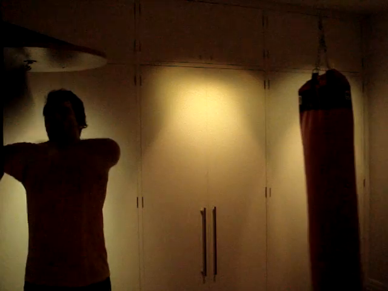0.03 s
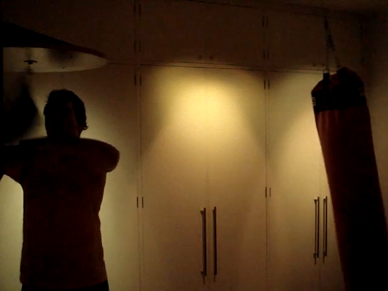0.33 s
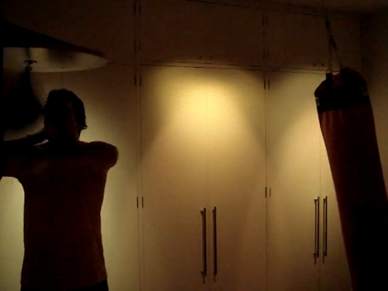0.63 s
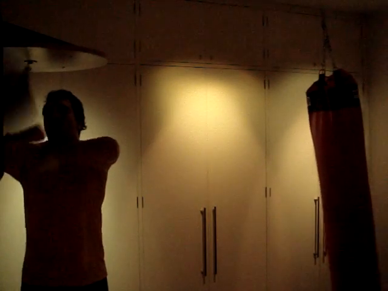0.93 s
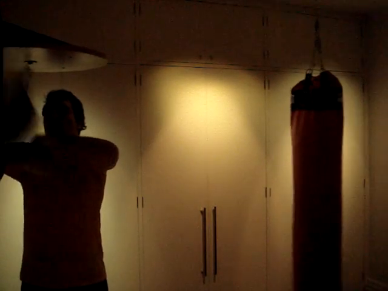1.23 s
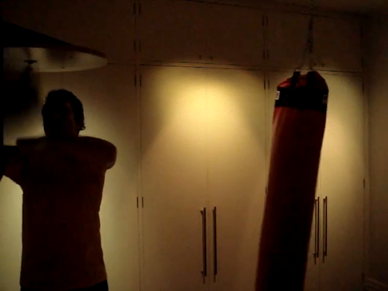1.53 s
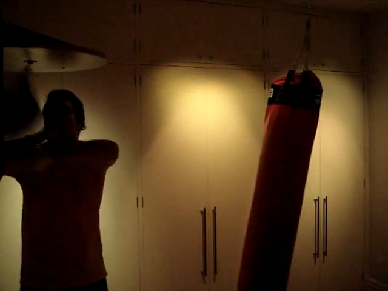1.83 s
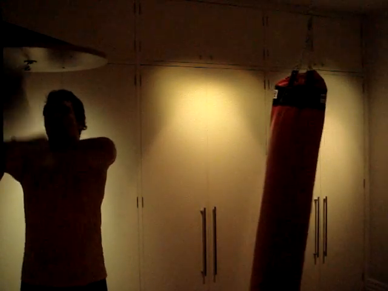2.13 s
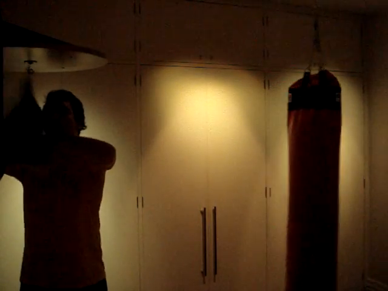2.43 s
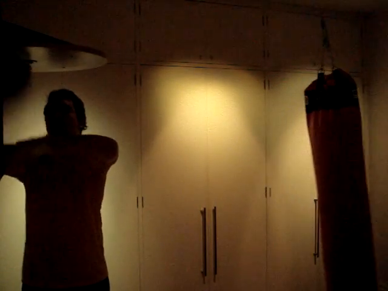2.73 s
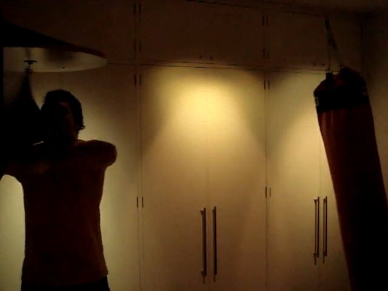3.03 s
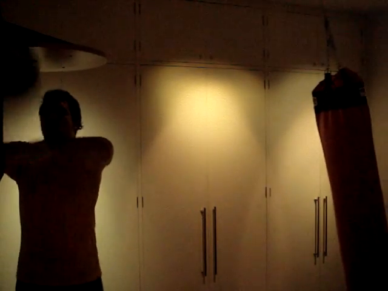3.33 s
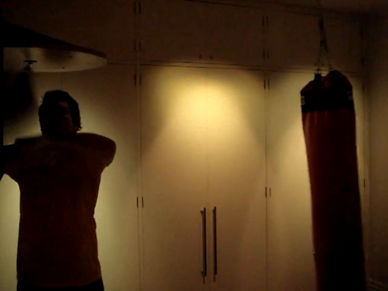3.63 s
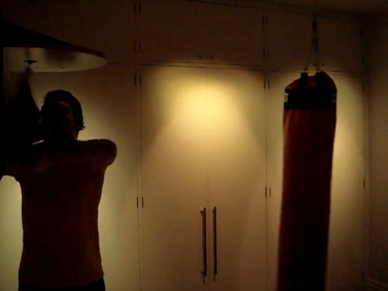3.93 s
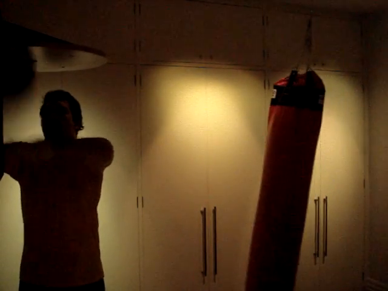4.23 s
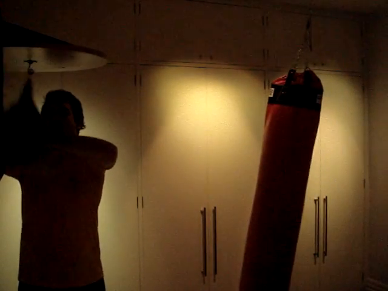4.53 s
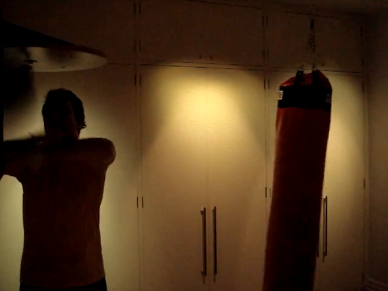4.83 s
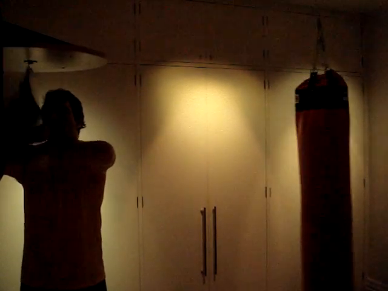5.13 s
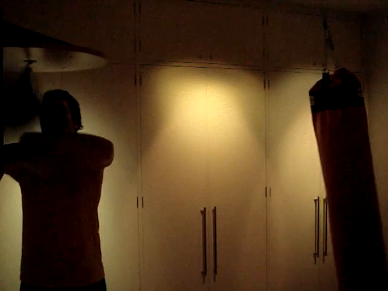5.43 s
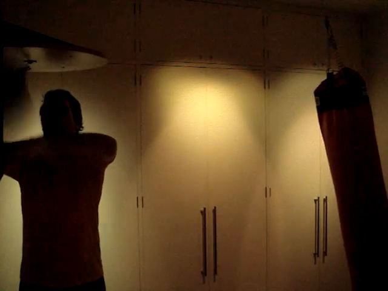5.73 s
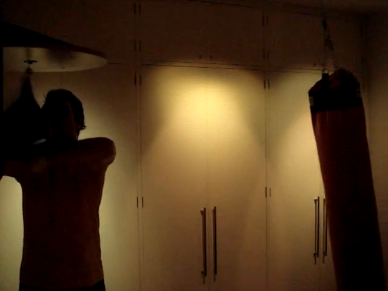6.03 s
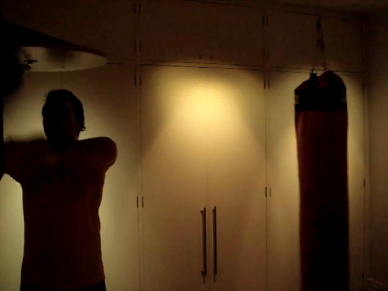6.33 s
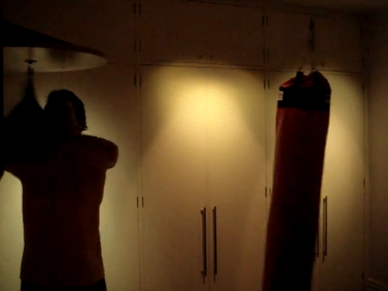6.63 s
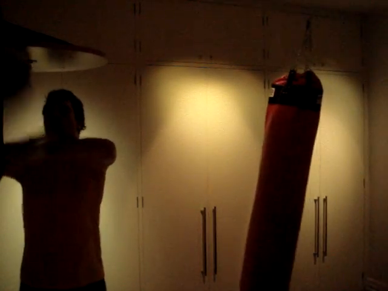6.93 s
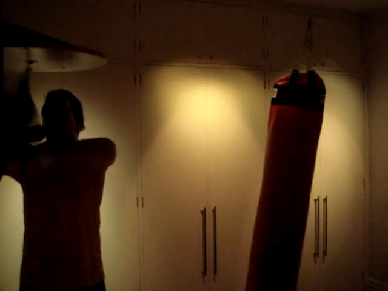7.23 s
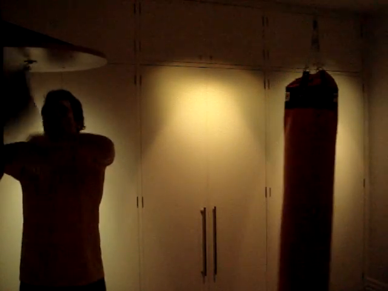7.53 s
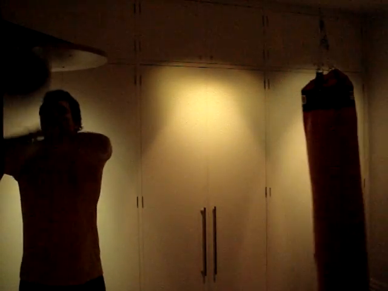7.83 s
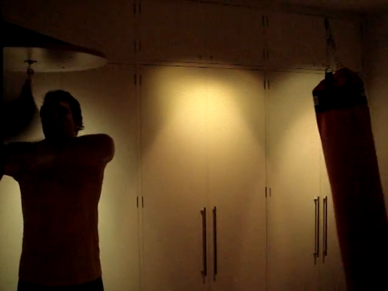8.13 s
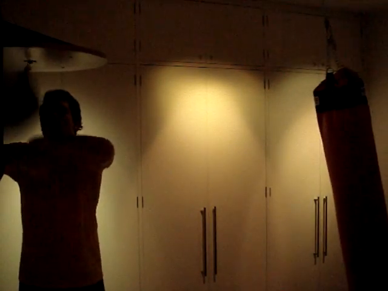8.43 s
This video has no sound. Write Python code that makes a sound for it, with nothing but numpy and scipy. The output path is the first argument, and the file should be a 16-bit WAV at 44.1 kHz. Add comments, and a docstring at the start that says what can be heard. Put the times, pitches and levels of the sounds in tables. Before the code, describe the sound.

Rapid, regular thuds and slaps of a speed bag rebounding off a wooden board, with a clacking, sometimes squeaking metal swivel.

```python
"""A leather speed bag is rolled, about 8.5 rebounds a second, in a small hard-walled room.
Each swing opens with a dull low thump, a knock and a faint brush. Some 40 ms later the bag slaps
the wooden platform, which knocks and booms. As the bag flattens against the board, the swivel
clacks on its stop. Five times, between 1.8 and 5.5 s, the swivel also squeaks.
A faint room rumble lies under it all."""
import sys
import numpy as np
from scipy import signal
from scipy.fft import rfft, irfft
from scipy.io import wavfile

SR = 44100
rng = np.random.default_rng(int(sys.argv[2]) if len(sys.argv) > 2 else 0)


def transcribe(u):
    """Save the signal u as a 16-bit wav file named by the first command-line argument.

    u: samples, shape (n,) or (channels, n), limited to [-1, 1]; the rate is SR.
    q: integer samples, one column per channel.
    """
    v = np.clip(np.atleast_2d(u).T, -1, 1)
    q = np.round(v * 32767).astype(np.int16)
    wavfile.write(sys.argv[1], SR, q)


N = 379260
SIZE = 16384   # samples per blow
AGE_S = np.arange(SIZE) / SR
HZ = np.maximum(np.fft.rfftfreq(SIZE, 1 / SR), 1)


def from_db(db):
    """Decibels to gain."""
    return 10 ** (np.asarray(db) / 20)


def rms_one(x):
    """Each row scaled to rms 1."""
    return x / np.sqrt(np.mean(x ** 2, axis=-1, keepdims=True) + 1e-20)


def butter(x, order, hz, kind="low"):
    """Butterworth filter."""
    return signal.sosfilt(signal.butter(order, hz, kind, fs=SR, output="sos"), x)


def spectrum_gain(points):
    """Gain through (Hz, dB) points on a log-frequency axis."""
    hz, db = np.transpose(points)
    return from_db(np.interp(np.log(HZ), np.log(hz), db))


def resonances(modes, skirt=1.96):
    """Gain of a body that radiates little below its lowest mode and above its highest."""
    power = sum(from_db(db) ** 2 / (1 + ((HZ / hz - hz / HZ) * hz / width_hz) ** 2)
                for hz, width_hz, db in modes)
    outside = np.maximum(modes[0][0] / HZ, HZ / modes[-1][0]) / skirt
    return np.sqrt(power / (1 + outside ** 8))


def minimum_phase(gain):
    """Causal response with this gain: nothing sounds before the contact."""
    cepstrum = irfft(np.log(gain + 1e-5))
    fold = np.r_[1, np.full(SIZE // 2 - 1, 2), 1, np.zeros(SIZE // 2 - 1)]
    return np.exp(rfft(cepstrum * fold))


def place(times_s, level_db, sounds, rms_window_s=0.08):
    """Lays sounds on the time line, each at its rms level over the opening window."""
    out = np.zeros(N + 3 * SIZE)
    for s, db, sound in zip(times_s, level_db, sounds):
        start = SIZE + round(s * SR)
        out[start:start + SIZE] += from_db(db) * sound / np.std(sound[:round(rms_window_s * SR)])
    return out[SIZE:SIZE + N]


def room_rumble(level_db=-52, band_hz=(25, 160)):
    """Faint low background of the room."""
    return from_db(level_db) * rms_one(butter(rng.standard_normal(N), 1, band_hz, "band"))


# Room decay. Each row: band centre in Hz, T60 in seconds.
ROOM_DECAY = [(200, 0.52), (800, 0.77), (3000, 0.6), (6000, 0.36), (10000, 0.27)]


def room_tails(count, gap_s, build_s, steady):
    """After a gap, reflections swell and die; all but a steady share change as the bag moves."""
    common = np.sqrt(steady) * rng.standard_normal(SIZE)
    changing = np.sqrt(1 - steady) * rng.standard_normal((count, SIZE))
    spectrum = rfft(common + changing)
    centres_hz, t60s_s = np.transpose(ROOM_DECAY)
    tail = 0
    for t60_s, selector in zip(t60s_s, np.eye(len(centres_hz))):
        band = np.interp(np.log(HZ), np.log(centres_hz), selector)
        tail = tail + irfft(spectrum * band) * from_db(-60 * AGE_S / t60_s)
    return rms_one(tail * np.clip((AGE_S - gap_s) / build_s, 0, 1))


def blows(times_s, level_db, body_gain, contact_s, direct_db, early_db, early_s, gap_s, build_s, steady,
          soft_hz=6000, yield_s=0.0025):
    """A short, rough contact rings a body; the near walls answer in a cluster, then the whole room."""
    count = len(times_s)
    yielding = 1 - np.exp(-AGE_S / yield_s)   # a soft contact builds its force gradually
    release = np.exp(-np.minimum(AGE_S / contact_s, 20))
    contact = rng.standard_normal((count, SIZE)) * yielding * release
    direct = from_db(direct_db) * rms_one(butter(contact, 2, soft_hz))
    early_age = np.clip((AGE_S - gap_s) / early_s, 0, 20)
    early = rms_one(rng.standard_normal((count, SIZE)) * early_age * np.exp(-early_age))
    heard = direct + from_db(early_db) * early + room_tails(count, gap_s, build_s, steady)
    return place(times_s, level_db, irfft(rfft(heard) * minimum_phase(body_gain)))


def clean_knocks(times_s, level_db, modes, vary_db):
    """A blunt push starts all modes together, each with its own strength on every blow."""
    hz, width_hz, db = np.transpose(modes)
    decay = np.exp(-np.minimum(np.pi * width_hz[:, None] * AGE_S, 20))
    rings = np.sin(2 * np.pi * hz[:, None] * AGE_S) * decay
    strengths = width_hz * from_db(db + vary_db * rng.standard_normal((len(times_s), len(hz))))
    polarity = (-1) ** np.arange(len(hz))
    return place(times_s, level_db, (strengths * polarity) @ rings)


# Bag meets platform. Each row: time in seconds, force in dB, snap of the first contact in dB.
REBOUNDS = [(-0.055, -0.5, -5), (0.063, -2.5, -5), (0.186, -0.5, -9), (0.298, -1.5, -5), (0.416, -3, -5),
            (0.525, 3.5, -2.0), (0.641, 0.5, 2), (0.761, 3, 0.5), (0.891, -1.5, -1), (1.003, 3, 4.0),
            (1.125, -1, -2.0), (1.236, 2.5, 2.0), (1.369, -2, 1), (1.478, 3, 5), (1.599, 1.0, -6),
            (1.724, -0.5, -4.0), (1.84, -2.5, -6), (1.965, 4, 0.0), (2.083, -2.5, -3.0), (2.208, 2.5, 5.0),
            (2.324, -2.5, 2), (2.432, 2.5, 1), (2.541, 1, 2), (2.661, -3, -5.0), (2.776, -3.5, -5),
            (2.9, 3, 1), (3.024, 0, 2.0), (3.144, -1.5, -0.5), (3.257, -2, -5.0), (3.373, 0, 0),
            (3.483, 1.5, -2.0), (3.597, -0.5, -5), (3.702, 1.5, -1), (3.816, -2.5, -4.0), (3.946, -0.0, 1),
            (4.049, -0.5, -3.0), (4.172, 1, 2.0), (4.276, 1, -4), (4.41, 0.5, 4), (4.51, -1, 0.0),
            (4.631, -1, -3), (4.744, 0, -1), (4.874, 0, 4.0), (4.979, -3.5, -4), (5.094, 2, 3.0),
            (5.218, 3.5, 1), (5.326, 2.5, 4.5), (5.445, 2.5, 0.0), (5.548, -1.5, 0.0), (5.677, 2.5, -2),
            (5.796, -3.0, 0), (5.908, 2, -3), (6.04, -2.5, 2.0), (6.141, -3.5, -4), (6.278, -1.0, 3.5),
            (6.38, -0.5, -11), (6.52, 0, 4), (6.622, 2, 3.0), (6.74, 0, -2), (6.851, -4, -4),
            (6.97, -2, -7), (7.086, 2.5, 2.0), (7.198, 0, 0.0), (7.319, 1.5, 2.5), (7.432, -3.5, -5.0),
            (7.552, 4.0, 4.0), (7.66, 3.5, 3.0), (7.772, -1.0, 3), (7.874, -1, -2), (7.987, 2.5, -3.0),
            (8.108, 1.5, -5), (8.22, 0, 6.0), (8.328, -0.5, 0.0), (8.446, 1, -1), (8.572, -0.5, -4)]


def swings():
    """Per swing: rebound time, force, snap, and the force with which the bag last came back."""
    rebound_s, force_db, snap_db = np.transpose(REBOUNDS)
    return_db = np.r_[0, force_db[:-1]]
    return rebound_s, force_db, snap_db, return_db


# Swivel rubs. Each row: start in seconds, length in seconds, start and end pitch in Hz, level in dB.
SQUEAKS = [(1.795, 0.18, 4800, 4300, -26), (2.49, 0.063, 4960, 4900, -26), (3.206, 0.074, 5000, 5140, -25),
           (5.251, 0.16, 4810, 4780, -24.5), (5.323, 0.13, 4380, 4290, -24.5)]


def swivel_squeaks(rasp_hz=300):
    """Dry metal rubs with a hoarse, sliding whistle."""
    out = np.zeros(N)
    for start_s, length_s, start_hz, end_hz, db in SQUEAKS:
        n, start = round(length_s * SR), round(start_s * SR)
        rasp = rms_one(butter(rng.standard_normal((2, n)), 3, rasp_hz))
        phase = 2 * np.pi * np.cumsum(np.linspace(start_hz, end_hz, n)) / SR
        whistle = rasp[0] * np.cos(phase) + rasp[1] * np.sin(phase)
        out[start:start + n] += from_db(db) * signal.windows.tukey(n, 0.5) * whistle
    return out


# Swivel resonances. Each row: frequency in Hz, width in Hz, level in dB.
SWIVEL_MODES = [(1434, 17, 2), (1700, 24, -9), (1730, 180, 2), (1870, 490, -2), (2283, 150, 3),
                (2685, 180, 2), (3190, 330, 4.5), (3800, 290, -5), (4660, 860, -3.5)]
# Swings that only graze the stop. Each row: rebound time in seconds, level change in dB.
GRAZES = [(.525, -20), (1.003, -4), (1.478, -18), (2.432, -10), (5.218, -8), (5.326, -7), (7.319, -18)]


def swivel_clacks(level_db=-23, spread_db=1.65, delay_s=0.0235, scatter_s=0.003):
    """The swivel hits its stop as the bag flattens; a fast return throws it harder on the next swing."""
    rebound_s, _, _, return_db = swings()
    clack_db = level_db + 0.56 * return_db + spread_db * rng.standard_normal(len(rebound_s))
    for graze_s, change_db in GRAZES:
        clack_db[np.argmin(np.abs(rebound_s - graze_s))] += change_db
    clack_s = rebound_s + delay_s + scatter_s * rng.standard_normal(len(rebound_s))
    return blows(clack_s, clack_db, resonances(SWIVEL_MODES), contact_s=0.012, direct_db=-1.5,
                 early_db=-2, early_s=0.0087, gap_s=0.0033, build_s=0.0042, steady=0.3)


# Tones of the low thump. Each row: frequency in Hz, level in dB, T60 in seconds.
THUMP_MODES = [(62.1, -3.5, 0.42), (91, -12, 0.89), (114, -14, 0.38)]


def low_thump(beat_s, level_db, lead_s, rise_s=0.0011, drop_db=-9, drop_s=0.011, drop_delay_s=0.04):
    """A low thump rings on, then falls about 9 dB shortly after the slap."""
    ring = 0
    for hz, db, t60_s in THUMP_MODES:
        detune = 1 + 0.028 * rng.standard_normal((len(beat_s), 1))
        ring = ring + np.sin(2 * np.pi * hz * detune * AGE_S) * from_db(db - 60 * AGE_S / t60_s)
    dropped = 0.5 + 0.5 * np.tanh((AGE_S - lead_s[:, None] - drop_delay_s) / drop_s)
    attack = 1 - np.exp(-AGE_S / rise_s)
    return -place(beat_s, level_db, ring * from_db(drop_db * dropped) * attack)


def lead_times(rebound_s, mean_s=0.042, delay_share=0.47):
    """Time from dull beat to slap: longer before a late rebound, so the dull beats run steadier."""
    gaps_s = np.diff(rebound_s)
    return mean_s + delay_share * np.r_[0, gaps_s - gaps_s.mean()]


# Slow swell of the dull beats. Each row: time in seconds, level in dB.
BEAT_SWELL = [(0, -1), (.7, 1), (1.2, 1), (2.2, 3), (3, -0.5), (4.6, -1.3), (5.4, .7), (6.2, -0.5),
              (7.7, 2.6), (8.15, -2), (8.6, 1)]
# Resonances of the dull knock. Each row: frequency in Hz, width in Hz, level in dB.
DULL_KNOCK_MODES = [(199, 33, 4), (230.3, 12.6, 7), (420, 42, -6), (498, 51, 0.5), (661, 65, -3.5),
                    (748, 31, 0), (857, 84, -10), (1050, 100, -12), (1235, 160, -6.5), (1640, 250, -17.5)]
# Faint brush. Each row: frequency in Hz, spectral density in dB.
BRUSH_SPECTRUM = [(500, -23), (2000, -8), (4000, -2.5), (6000, 0.5), (8000, -1.5), (10000, -13.5)]


def dull_beats(thump_db=-28.5, knock_db=-29, body_db=-22.5, brush_db=-37, brush_spread_db=5.5):
    """In each swing a dull low thump, with a knock and faint brush, precedes the slap."""
    rebound_s, _, _, return_db = swings()
    lead_s = lead_times(rebound_s)
    beat_s = rebound_s - lead_s
    swell_db = np.interp(beat_s, *np.transpose(BEAT_SWELL))
    drive_db = 0.75 * swell_db + 0.16 * return_db
    chance_db = brush_spread_db * rng.standard_normal(len(beat_s))
    knock = clean_knocks(beat_s + 0.002984, knock_db + drive_db, DULL_KNOCK_MODES, vary_db=4)
    body = blows(beat_s + 0.001996, body_db + drive_db, resonances(DULL_KNOCK_MODES),
                 contact_s=0.0036, direct_db=-13,
                 early_db=-3, early_s=0.0056, gap_s=0.012, build_s=0.003, steady=0.58)
    brush = blows(beat_s - 0.004, brush_db + chance_db, spectrum_gain(BRUSH_SPECTRUM),
                  contact_s=0.0045, direct_db=5,
                  early_db=22, early_s=0.0055, gap_s=0.0005, build_s=0.0023, steady=0.15)
    thump = low_thump(beat_s, thump_db + swell_db + 0.33 * return_db, lead_s)
    return thump + knock + body + brush


# Leather on wood. Each row: frequency in Hz, spectral density in dB.
SLAP_SPECTRUM = [(400, -16.5), (1100, -12), (1700, -2.5), (2500, -4.5), (3300, -1), (4300, -2.5),
                 (5300, -1), (7000, -4), (8500, -8.5), (10000, -14.5)]
# Upper and lower board resonances. Each row: frequency in Hz, width in Hz, level in dB.
BOARD_KNOCK_MODES = [(347, 28, -9), (414.3, 17.3, -1.5), (493, 31.6, 0.5), (595, 19, -8.5), (686, 40, -7.5),
                     (782, 35, -7.5), (833, 25.5, 1), (916, 44, -7.5), (1017, 79, -15), (1235, 64, -6.5)]
BOARD_BOOM_MODES = [(151.6, 7.1, -8), (196, 14, -0.5), (216.5, 14, 1.5), (240, 25, -4.5), (316, 13, -16)]


def platform(slap_db=-20, knock_db=-21.5, boom_db=-26.5, flatten_db=-30.5, puff_db=-38.5):
    """Leather slaps the board, which knocks, then booms as the bag flattens on it."""
    rebound_s, force_db, snap_db, _ = swings()
    # On hard rebounds the bright slap is quieter, the knock and boom louder.
    slap_gain_db, knock_gain_db, low_gain_db = -0.43 * force_db, 0.99 * force_db, 0.97 * force_db
    bite_db = 1.1 * force_db[:, None]   # a hard rebound knocks more abruptly
    slap = blows(rebound_s - 0.001, slap_db + slap_gain_db, spectrum_gain(SLAP_SPECTRUM),
                 contact_s=0.0049, direct_db=snap_db[:, None] - 8.5,   # a flat landing snaps more
                 early_db=-14, early_s=0.0095, gap_s=0.011, build_s=0.0035, steady=0.36, soft_hz=5160)
    knock = blows(rebound_s, knock_db + knock_gain_db, resonances(BOARD_KNOCK_MODES),
                  contact_s=0.0069, direct_db=bite_db - 7,
                  early_db=2, early_s=0.018, gap_s=0.0066, build_s=0.0081, steady=0.46)
    boom = blows(rebound_s, boom_db + low_gain_db, resonances(BOARD_BOOM_MODES),
                 contact_s=0.0025, direct_db=-11.5,
                 early_db=1, early_s=0.016, gap_s=0.0059, build_s=0.0057, steady=0.44)
    flatten = clean_knocks(rebound_s + 0.0294, flatten_db + low_gain_db, BOARD_BOOM_MODES, vary_db=0.5)
    puff_modes = [(hz, 20, -db) for hz, db, _ in THUMP_MODES]   # 20 Hz wide, upper modes favoured
    puff = clean_knocks(rebound_s + 0.0038, puff_db + low_gain_db, puff_modes, vary_db=3.5)
    return slap + knock + boom + flatten + puff


def scene():
    """Everything reaches one microphone."""
    return (dull_beats() + platform() + swivel_clacks() + swivel_squeaks() + room_rumble())[None]


def record(dry, ceiling=0.51, bass_hz=40, cutoff_hz=9950):
    """A small recorder: rounded peaks, no deep bass, the top cut off."""
    rounded = ceiling * np.tanh(dry / ceiling)
    thin = butter(rounded, 4, bass_hz, "high")
    return signal.sosfilt(signal.ellip(12, 0.1, 80, cutoff_hz, fs=SR, output="sos"), thin)


dry = scene()
out = record(dry)
transcribe(out)
```